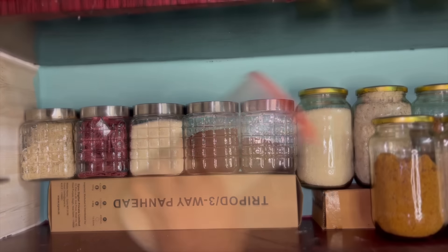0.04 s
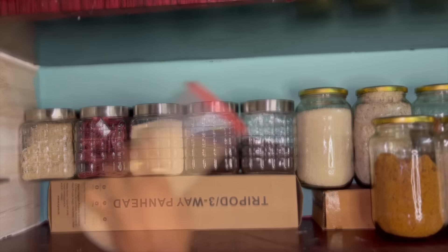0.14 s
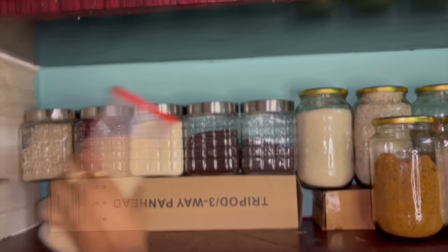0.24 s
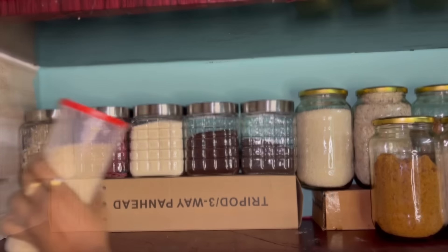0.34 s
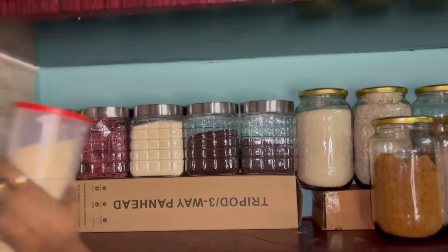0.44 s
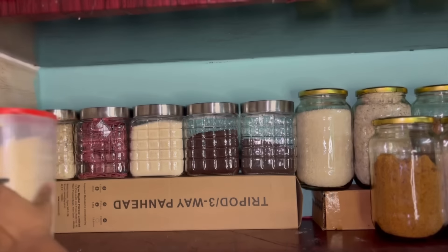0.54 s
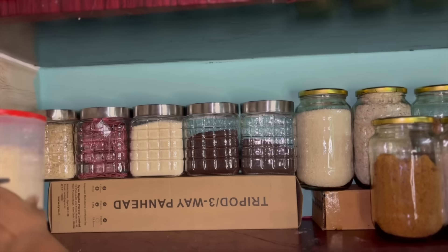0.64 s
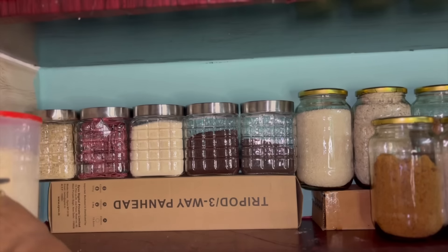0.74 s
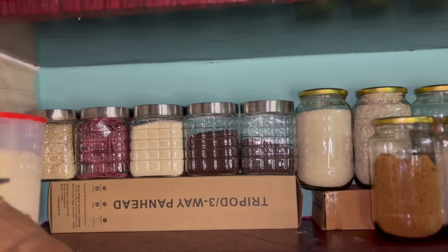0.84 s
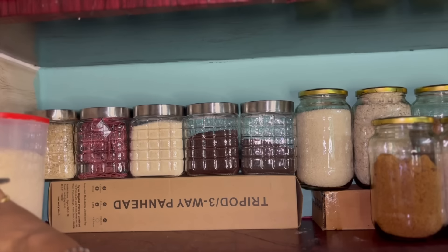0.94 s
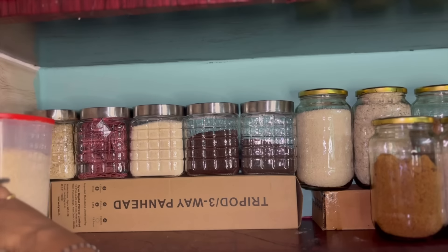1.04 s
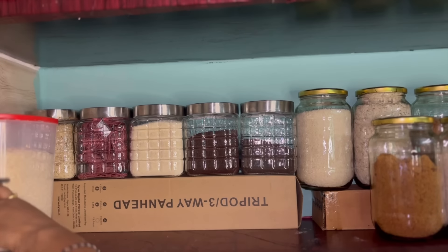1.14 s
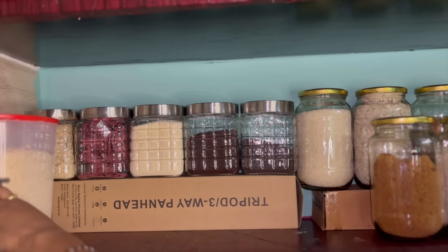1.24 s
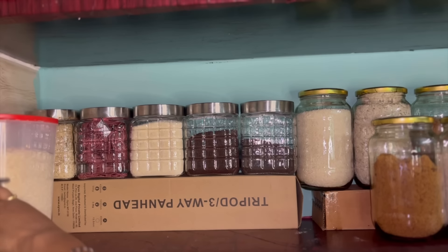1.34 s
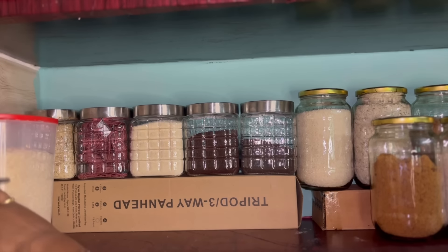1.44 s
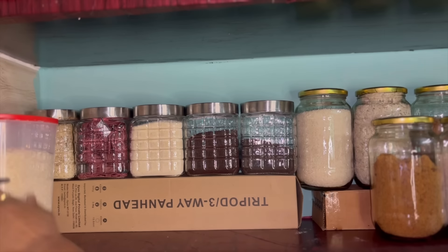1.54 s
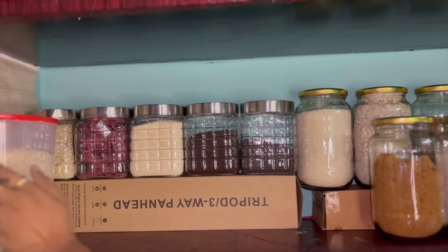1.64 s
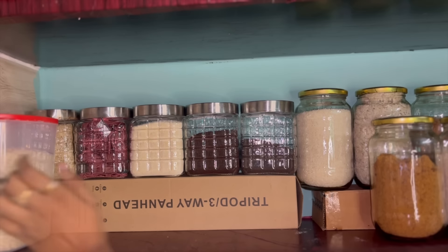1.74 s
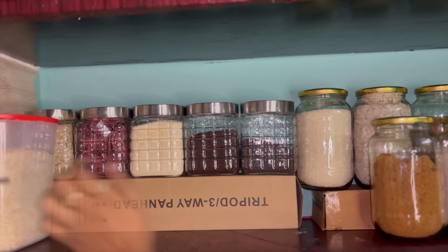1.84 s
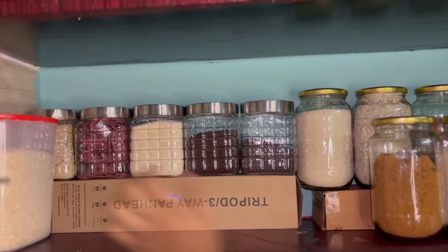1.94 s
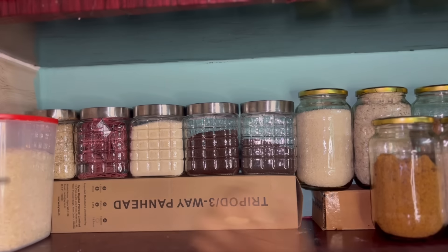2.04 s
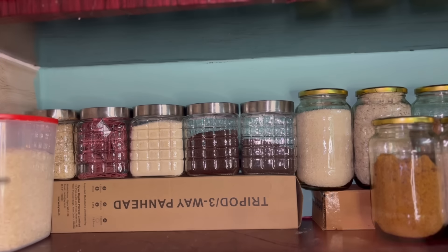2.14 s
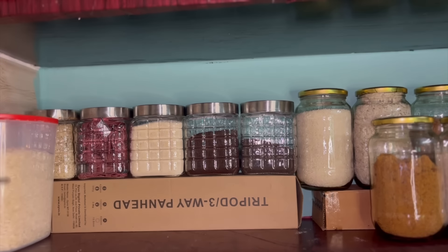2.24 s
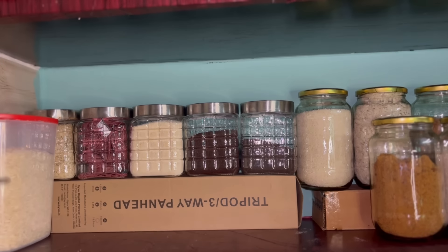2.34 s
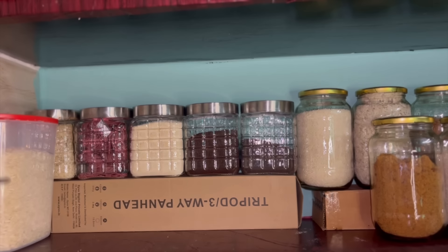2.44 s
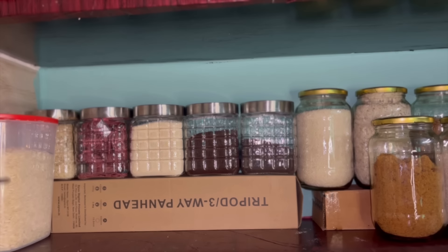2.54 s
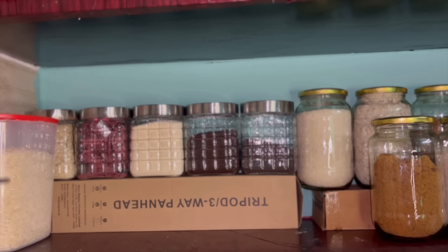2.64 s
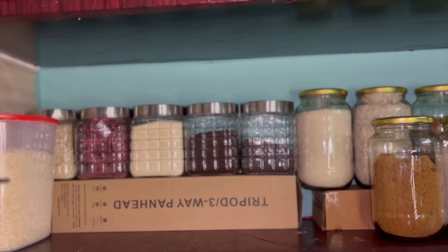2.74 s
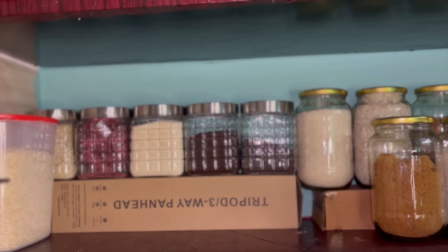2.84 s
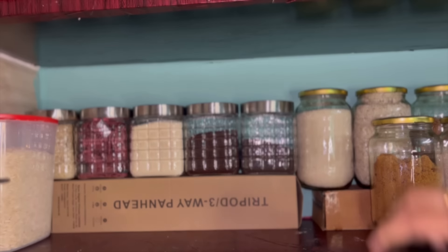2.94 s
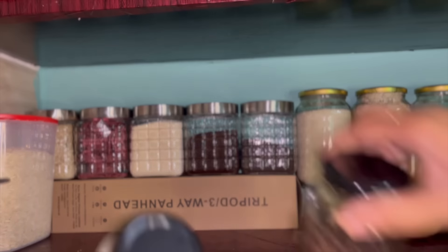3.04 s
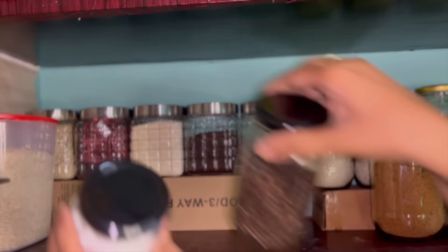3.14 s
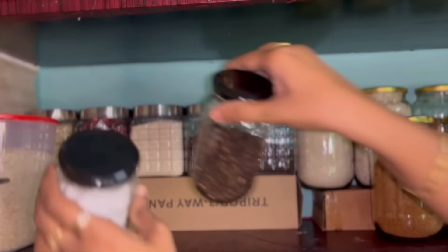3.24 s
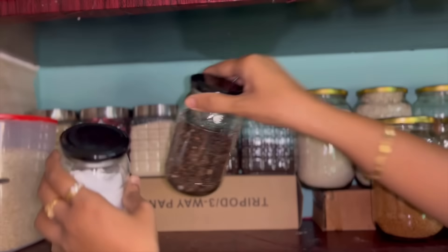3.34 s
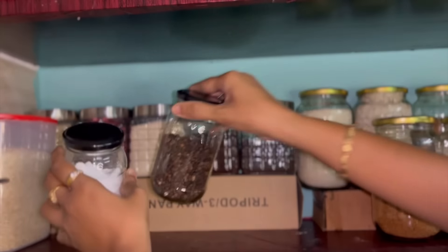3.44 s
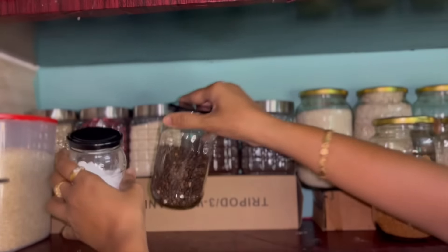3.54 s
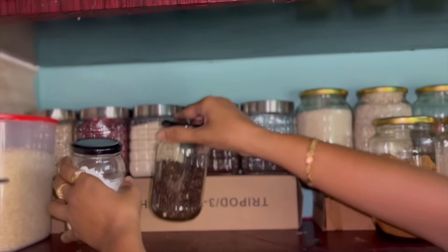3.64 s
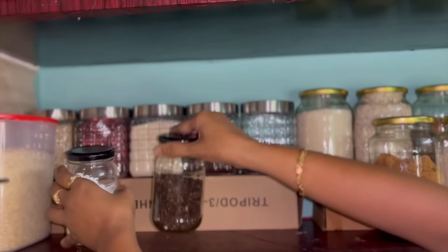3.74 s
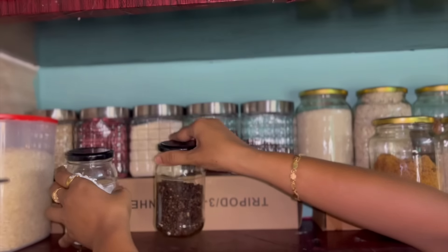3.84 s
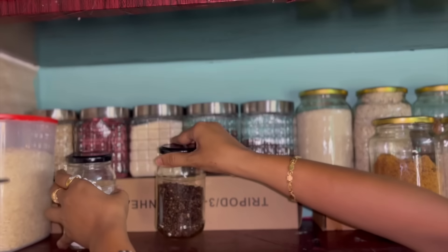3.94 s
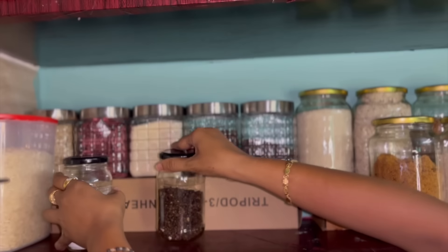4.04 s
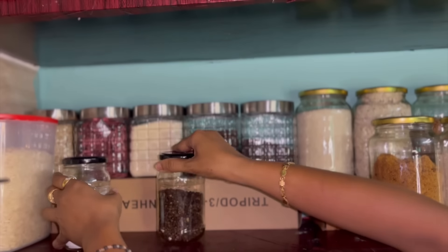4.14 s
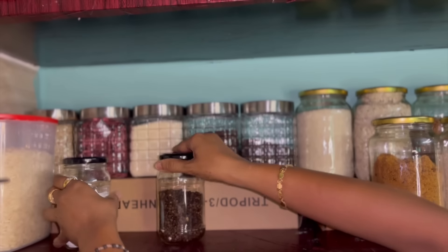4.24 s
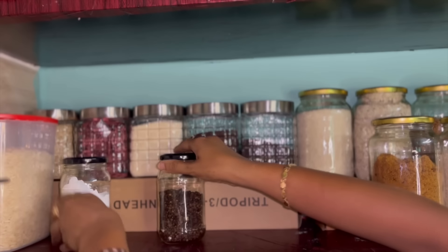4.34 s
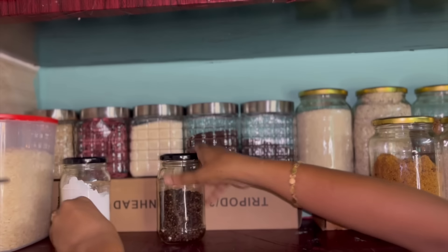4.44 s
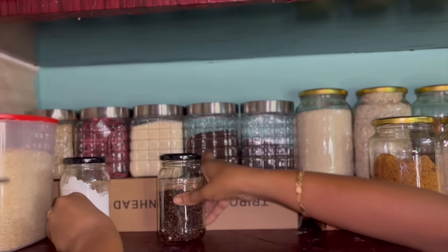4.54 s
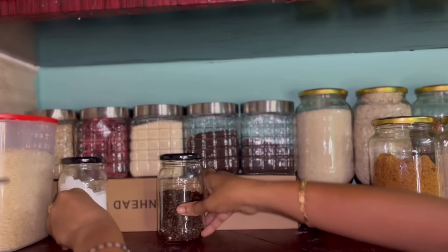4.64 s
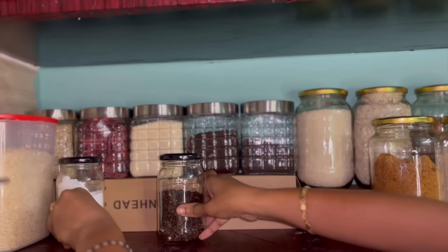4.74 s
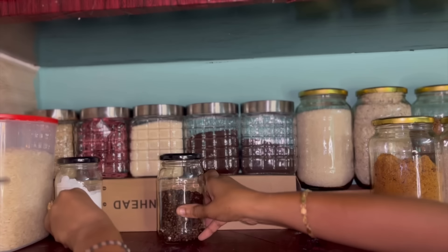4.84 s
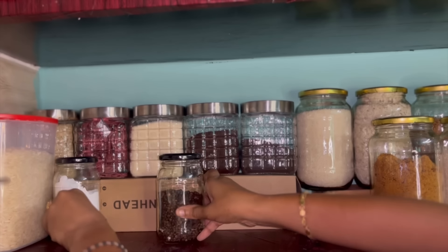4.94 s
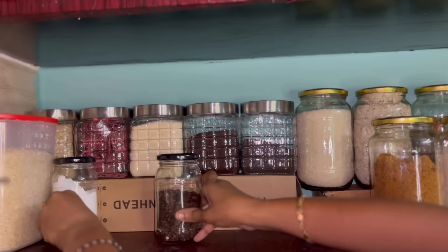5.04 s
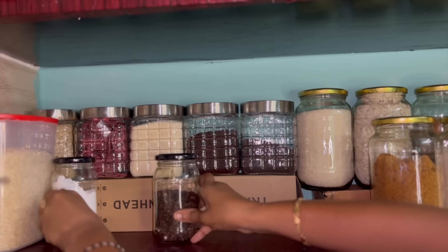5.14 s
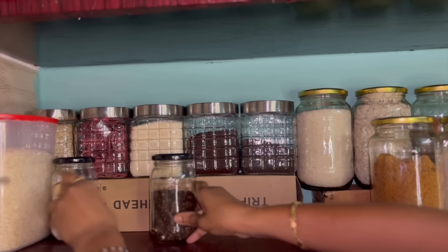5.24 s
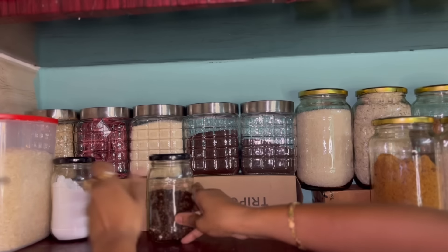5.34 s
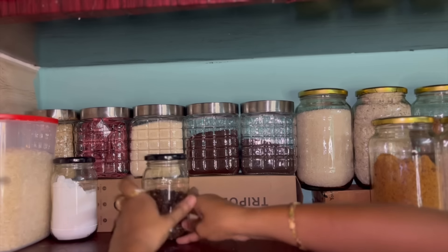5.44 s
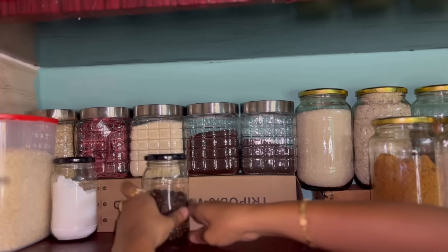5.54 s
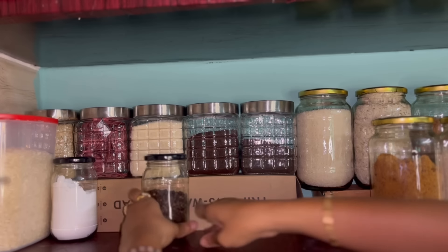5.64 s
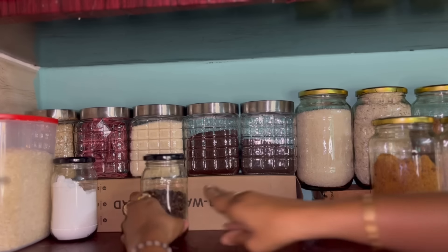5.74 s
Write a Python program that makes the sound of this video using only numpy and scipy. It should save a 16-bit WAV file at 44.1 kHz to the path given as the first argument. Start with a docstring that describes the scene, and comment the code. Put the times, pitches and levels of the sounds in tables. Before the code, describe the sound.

Grain rattles and hands rustle as a tub is put down in a cluster of dull plastic knocks, dragged and stopped by a heavy wall bump. Near silence follows, broken by one clink and a short double knock. Later a glass jar settles in quick rocking clunks, followed by soft taps and low drags of a heavy jar, with tiny bracelet ticks. Close stereo microphone, short indoor tail, low motor hum.

```python
"""A plastic tub of grain is put down, shoved along a pantry shelf and bumps the wall, close to a stereo microphone.
Something clinks off to the side, something knocks near the middle; two glass jars are set on the board: one
rocks, the one full of powder is nudged into line. Impacts are damped modes plus a noise crack, with a room tail.
Hands, grains and sliding bases are shaped noise bands; a bracelet ticks in short blurred rings.
A fridge-like hum (wavering line in narrow fuzz) and room hiss lie beneath."""
import sys
import numpy as np
from scipy import signal
from scipy.fft import rfft, irfft, next_fast_len
from scipy.io import wavfile
from scipy.ndimage import uniform_filter1d, map_coordinates

SR = 44100
rng = np.random.default_rng(int(sys.argv[2]) if len(sys.argv) > 2 else 0)


def transcribe(u):
    """Save the signal u as a 16-bit wav file named by the first command-line argument.

    u: samples, shape (n,) or (channels, n), limited to [-1, 1]; the rate is SR.
    q: integer samples, one column per channel.
    """
    v = np.clip(np.atleast_2d(u).T, -1, 1)
    q = np.round(v * 32767).astype(np.int16)
    wavfile.write(sys.argv[1], SR, q)


def voltage_ratio(level):
    """Linear amplitude factor for a level in decibels (scalar or array-like)."""
    return 10 ** (np.asarray(level, float) / 20)


N = 254898  # samples

# Impacts, mode drive per pitch group before trim: start_s, low_db, middle_db, high_db, crack_db, left_minus_right_db
TUB_BLOWS = [(0.326, -22.5, -25.5, -35.5, -48, 5), (0.331, -22, -21, -43, -51.5, -11),
             (0.43, -29, -73, -66, -59, -7), (0.482, -28.5, -70, -76, -61, 1),
             (0.532, -16.5, -36.5, -33, -43, 3.5), (0.595, -24, -55.5, -76, -43.5, -4),
             (0.654, -30.5, -52.5, -63, -46, -3), (0.738, -24.5, -31.5, -42, -48.5, -4.5),
             (0.806, -34, -47, -37, -42, -2)]
WALL_BUMP_BLOWS = [(1.074, -14, -16, -15, -38, 0.5), (1.082, -5.5, -15, -16.5, -42.5, 0.95)]
JAR_BLOWS = [(3.968, -36, -17, -21.5, -36.5, -13.5), (3.974, -30, -14, -23, -40, 10.5),
             (4.051, -29.5, -13, -14.5, -46.5, -4.5), (4.058, -37.5, -19, -19.5, -39, 9.5),
             (4.156, -37.5, -26.5, -38, -78, 2), (4.166, -44, -21, -34.5, -78.5, -1),
             (4.295, -50, -41.5, -83.5, -87, 8)]
POWDER_JAR_BLOWS = [(4.512, -56, -53, -72, -69.5, 2.3), (4.561, -41, -28.5, -49.5, -73, 3.9),
                    (4.596, -31.5, -34, -54.5, -78, 9.7), (4.62, -37, -32, -45.5, -73, 1.9),
                    (4.723, -45, -30.5, -40.5, -80, 3.2), (4.899, -43.5, -55, -68, -78.5, 3.1),
                    (5.001, -48.5, -46.5, -71, -68, 5), (5.109, -58, -57, -60, -70, 3.1),
                    (5.169, -39.5, -49, -59.5, -75, 2.3), (5.728, -47.5, -48, -63, -72.5, 7.0),
                    (5.747, -49, -40, -50, -64, 1.0), (5.771, -33, -26.5, -42, -61, 8.6)]
CLINK_BLOWS = [(2.157, -63, -31.5, -24, -33, -0.5), (2.165, -36, -32.5, -26.5, -40.5, -19.5)]
KNOCK_BLOWS = [(2.5, -22.5, -18, -31.5, -60, -3.5), (2.517, -25.5, -32, -42, -54, 4.5)]
# Borders of the low, middle and high mode groups: pitch_hz
GROUP_EDGES_HZ = [350, 1100]

# Modes of each object, board included: pitch_hz, relative_db, t60_s
TUB_MODES = [(107, -2.5, 0.1), (144.6, -10, 0.052), (218, 0.5, 0.12), (251.8, 3, 0.088), (403, -5, 0.12),
             (491.6, 10.5, 0.057), (530, -2, 0.021), (710, -2, 0.0088), (771, -1, 0.053), (901, -5, 0.043),
             (1138, 3.5, 0.03), (1296, 4.5, 0.048), (1680, 3, 0.056), (1930, 6.5, 0.017), (2382, 1, 0.025)]
WALL_BUMP_MODES = [(91, -8.5, 0.066), (151, -10.5, 0.11), (213.7, -0.5, 0.06), (412, -1.5, 0.17),
                   (591, 7.5, 0.031), (819, -6.5, 0.19), (941, -2, 0.061), (1140, -0.5, 0.045),
                   (1290, 2, 0.024), (1585, -11.5, 0.054), (1835, -5, 0.065), (2373, -1.5, 0.047),
                   (2530, 4, 0.027), (2620, -3.5, 0.052), (3040, -17, .04), (3430, -12, 0.03)]
JAR_MODES = [(205, -2, 0.1), (290, -10.5, 0.021), (416.7, -3.5, 0.051), (492, 5, 0.048),
             (570.7, -8.5, 0.084), (739, 2, 0.026), (786, -10.5, 0.047), (906, -15, 0.085),
             (995, -9.5, 0.051), (1173, 0.5, 0.047), (1299.5, 4.5, 0.057), (1456, -10, 0.027),
             (1564, -5, 0.031), (1697, -11.5, 0.061), (1940, -14.5, 0.051), (2240, -15.5, 0.027),
             (2401, -20, 0.054), (3280, -29, 0.085)]
POWDER_JAR_MODES = [(198.7, -2.5, 0.21), (237.6, -8, 0.19), (405.8, 2.5, 0.17), (487.5, 3.5, 0.1),
                    (567, 0, 0.068), (774, -9, 0.08), (990, -22, 0.068), (1245, 4.5, 0.035),
                    (1274, 7.5, 0.05), (1776, -10.5, 0.051)]
CLINK_MODES = [(254, 6, 0.045), (511, 5.5, 0.056), (794.5, 9, 0.041), (1168, 4.5, 0.019), (1370, -4, 0.051),
               (1365, -0.5, 0.065), (1599, -2, 0.052), (2070, -12.5, 0.14), (3280, -19.5, 0.097),
               (3594, -6, 0.079), (3430, -3.5, 0.085), (3690, -12, 0.024), (3950, -7, 0.04),
               (4245, -5, 0.022), (4530, -7.5, 0.031), (4380, -7.5, 0.031), (4750, -4.5, 0.041),
               (4800, -6.5, 0.05), (5020, -6.5, 0.088)]
KNOCK_MODES = [(73.5, -15.5, 0.76), (261.8, -4.5, 0.14), (327, 1.5, 0.11), (527, -0.5, 0.037),
               (542, -6.5, 0.086), (784, -4.5, 0.11), (893, 3, 0.075), (1290, 5, 0.053),
               (1361, 11.5, 0.048), (1483, 11.5, 0.039), (1680, -2.5, 0.04), (2160, -9, 0.053),
               (2560, -19.5, 0.036)]

# Contact noise, bright and dull (thick glass on wood): frequency_hz, relative_db_per_hz
CRACK_SPECTRUM = [(1500, 1), (3000, -0.5), (5000, -2.5), (6800, -8.5), (9000, -5.5), (11500, -14),
                  (12800, -30.5), (14200, -14), (15600, -11.5), (16400, -39.5)]
DULL_CRACK_SPECTRUM = [(1800, -13.5), (3000, 1), (4200, -8), (5500, -10), (6500, -22), (9000, -27.5),
                       (12000, -44)]

# Hand strokes: peak_s, length_s, skin_rustle_db, grain_rattle_db
STROKES = [(0.06, 0.27, -61.5, -57.5), (0.15, 0.069, -58, -54), (0.205, 0.036, -75, -64),
           (0.39, 0.093, -61.5, -56.5), (0.56, 0.085, -50, -48), (0.61, 0.26, -56.5, -53),
           (0.95, 0.41, -76.5, -69), (1.44, 0.062, -81, -93), (1.57, 0.22, -70, -76),
           (1.75, 0.052, -66, -88), (1.86, .06, -83, -95), (2.02, 0.18, -81, -75), (2.2, 0.19, -73.5, -61),
           (2.58, 0.73, -100, -81), (3.0, .25, -82, -73.5), (3.12, 0.42, -78.5, -68),
           (3.3, 0.49, -88.5, -71.5), (4.0, 0.41, -89.5, -77), (4.36, 0.31, -68, -71),
           (4.54, 0.22, -75, -68.5), (4.72, 0.99, -84, -78.5), (4.98, 0.088, -66, -72),
           (5.16, 0.11, -75.5, -80), (5.28, 0.17, -66.5, -71.5), (5.48, 0.29, -64.5, -68.5),
           (5.69, .07, -66.5, -72), (5.75, .03, -67.5, -75), (5.8, 0.09, -76, -59)]
# Bases pushed along the board: peak_s, length_s, scrape_db, drag_db, shelf_rumble_db
SHOVES = [(0.12, 0.15, -62.5, -64, -64), (0.35, 0.12, -59, -51, -35.5), (0.48, 0.13, -71, -53.5, -39.5),
          (0.57, 0.23, -52.5, -45.5, -38.5), (0.68, 0.39, -61, -63, -47), (1.0, 0.69, -64.5, -63.5, -54),
          (2.35, 0.53, -69, -73, -67), (2.7, 1, -73.5, -69.5, -65), (3.25, .8, -74.5, -60, -66),
          (4.03, 0.28, -66, -51.5, -44), (4.17, 0.26, -69.5, -46.5, -49), (4.66, 0.64, -80, -53, -49.5),
          (5.25, 1.1, -72, -65.5, -57.5)]
# Steady murmur in the scrape, drag and rumble bands, mean: level_db
STILL_DB = [-72.5, -71, -68.5]
# Handling noise bands: frequency_hz, relative_db_per_hz
RATTLE_SPECTRUM = [(1800, -3.5), (2800, -5), (3500, -6), (5000, -3.5), (6200, -5.5), (7200, -33)]
RUSTLE_SPECTRUM = [(6200, -2.5), (7500, 6.5), (9500, 5.5), (11500, 4.5), (12200, -26)]
TOP_RUSTLE_SPECTRUM = [(13000, -29.5), (13800, -5), (14800, -14.5), (15700, -1.5), (16300, -28.5)]
SCRAPE_SPECTRUM = [(600, -33.5), (900, -7), (1300, -2), (1700, -0.5), (2200, -5), (2700, -44), (3500, -52)]
DRAG_SPECTRUM = [(110, -3.5), (160, 1), (210, 2), (300, -4), (420, 0), (550, -4), (700, -12), (1000, -20.5)]
RUMBLE_SPECTRUM = [(35, -49.5), (55, 6.5), (75, 8.5), (110, 4), (150, -17.5), (200, -38.5)]

# Bracelet ticks, mode drive per bead group: start_s, middle_db, low_db, high_db, left_minus_right_db
BRACELET_TICKS = [(2.518, -54.5, -49, -82.5, -3), (2.603, -58.5, -60.5, -71, -5.5),
                  (3.0294, -75, -59.5, -86.5, -11), (3.078, -58, -61, -74, -8),
                  (3.1512, -45.5, -59, -65, 1), (3.1626, -54, -52.5, -58.5, -9),
                  (3.4415, -63, -77, -83.5, 1.0), (3.9079, -75, -66.5, -109, 0),
                  (4.0512, -68, -64, -62.5, -10.5), (4.1026, -61.5, -63, -71, -6.5),
                  (4.352, -60, -72.5, -64, 2.5), (4.543, -56, -62.5, -69.5, -8),
                  (4.9691, -45.5, -64.5, -54, -3.5), (5.1694, -67, -82.5, -81, -3)]
# Bead modes: pitch_hz, relative_db, t60_s
BRACELET_MODES = [(3430, -1.5, 0.017), (5000, 0.5, 0.016), (5800, -5.5, 0.018), (7850, -7.5, 0.027),
                  (9000, -11, 0.014), (9900, -5.5, 0.031), (11000, -8, .015), (14200, -6.5, 0.014),
                  (15200, 9, .012)]
# Borders of the low, middle and high bead groups: pitch_hz
BEAD_EDGES_HZ = [6500, 12000]

# Fuzz around the hum, room hiss: frequency_hz, relative_db_per_hz
HUM_SPECTRUM = [(22, -26.5), (40, -18), (52, -19), (60, -3.5), (64, -8.5), (75, -9), (100, -32.5)]
AIR_SPECTRUM = [(20, -5.5), (40, -7.5), (200, -13.5), (2500, -27), (6000, -30.5), (11000, -41.5),
                (13000, -51.5), (20000, -61.5)]
# Reverberation: frequency_hz, t60_s
ROOM_DECAY = [(100, 0.58), (400, 0.29), (1500, 0.29), (5000, 0.26), (12000, 0.094)]

TOP_RUSTLE_DB = -0.5  # top treble of the hand rustle re its lower treble
SWELL_DB, FADE_DB, POINT = 80.5, 23, 1.6  # loss one length before, after the peak; larger POINT = flatter top
UNEVEN_DB, UNEVEN_PER_S = 3, 30
HUM_HZ = 60
MONO_HZ, LOW_CUT_HZ = 190, 42


def tub():
    """Plastic tub of grain put down: thuds and knocks with a bright crack."""
    return struck(TUB_BLOWS, TUB_MODES, CRACK_SPECTRUM, trim_db=-2.5, rise_s=0.003, crack_t60_s=0.12,
                  turn_rad=0.28, rough=0.061, shade_hz=203.4, wet_db=-9.5)


def wall_bump():
    """Tub meets the wall: strong low modes with a bright crack."""
    return struck(WALL_BUMP_BLOWS, WALL_BUMP_MODES, CRACK_SPECTRUM, trim_db=-3.0, rise_s=0.003, crack_t60_s=0.19,
                  turn_rad=0.3, rough=0.023, shade_hz=200.6, wet_db=-10.0)


def jar():
    """Glass jar set on the board, rocking: repeated blows with a dull crack."""
    return struck(JAR_BLOWS, JAR_MODES, DULL_CRACK_SPECTRUM, trim_db=4.5, rise_s=0.0048, crack_t60_s=0.026,
                  turn_rad=0.53, rough=0.015, shade_hz=295.4, wet_db=-10)


def powder_jar():
    """Full jar set down and nudged into line: soft blows, few modes, dull crack."""
    return struck(POWDER_JAR_BLOWS, POWDER_JAR_MODES, DULL_CRACK_SPECTRUM, trim_db=0.5, rise_s=0.0044,
                  crack_t60_s=0.034, turn_rad=0.53, rough=0.028, shade_hz=300, wet_db=-8.0)


def clink():
    """Something clinks off to the side: modes reaching 5 kHz, short bright crack."""
    return struck(CLINK_BLOWS, CLINK_MODES, CRACK_SPECTRUM, trim_db=-4.5, rise_s=0.0021, crack_t60_s=0.032,
                  turn_rad=0.53, rough=0.033, shade_hz=4970, wet_db=-5.0)


def knock():
    """Something knocks: two close blows near the middle, modes under 2.6 kHz, dull crack."""
    return struck(KNOCK_BLOWS, KNOCK_MODES, DULL_CRACK_SPECTRUM, trim_db=-1.5, rise_s=0.0013, crack_t60_s=0.063,
                  turn_rad=0.32, rough=0.039, shade_hz=300, wet_db=-10)


def struck(blows, modes, crack_spectrum, trim_db, rise_s, crack_t60_s, turn_rad, rough, shade_hz, wet_db):
    """Each blow drives low, middle and high modes by its own amounts and cracks at the contact."""
    out = np.zeros((2, N + SR))
    t = np.arange(SR // 3) / SR
    group = np.searchsorted(GROUP_EDGES_HZ, [hz for hz, _, _ in modes])
    for start_s, *drive_db, crack_db, pan_db in blows:
        noise = unit(coloured(rng.standard_normal(len(t)), crack_spectrum))
        crack = noise * voltage_ratio(crack_db - 60 * t / crack_t60_s) * (1 - np.exp(-t / rise_s))
        mode_drive_db = trim_db + np.array(drive_db)[group, None]
        body = ring(modes, mode_drive_db, pan_db, rise_s, turn_rad, rough, shade_hz)
        add(out, start_s, body + sides(pan_db) * crack, wet_db)
    return out[:, :N]


def ring(modes, drive_db, pan_db, rise_s, turn_rad, rough, shade_hz):
    """Damped modes swell during contact; chatter blurs each by the share rough of its pitch."""
    hz, db, t60_s = np.transpose(modes)[:, :, None]
    t = np.arange(SR // 3) / SR
    scatter_db = 1.5 * rng.standard_normal((len(modes), 1))
    decay = voltage_ratio(db + drive_db + scatter_db - 60 * t / t60_s)
    envelope = decay * (1 - np.exp(-(t / rise_s) ** 2))
    steps = rng.standard_normal((len(modes), len(t)))
    for _ in range(2):
        steps = uniform_filter1d(steps, size=24)
    phase = 2 * np.pi * hz * t + np.sqrt(2 * np.pi * rough * hz / SR) * np.cumsum(steps, 1)
    # neighbouring modes lead at opposite ports
    lead = turn_rad * (-1) ** np.arange(len(modes))[:, None]
    # low modes bend round the microphone
    shade_db = pan_db / 2 * np.minimum(hz / shade_hz, 1)
    ports = [voltage_ratio(side * shade_db) * envelope * np.sin(phase + side * lead) for side in (1, -1)]
    return np.array([port.sum(0) for port in ports])


def hands():
    """Grain rattles, skin rustles, bases scrape and drag on the board, the shelf rumbles."""
    uneven = voltage_ratio(UNEVEN_DB * wobble(UNEVEN_PER_S))
    rustle, rattle = uneven * curves(STROKES)
    still = voltage_ratio(np.array(STILL_DB)[:, None] + [1.5 * wobble(6.2) for _ in STILL_DB])
    scrape, drag, rumble = np.hypot(curves(SHOVES), still)
    top_rustle = voltage_ratio(TOP_RUSTLE_DB) * rustle
    return (rattle * rush(RATTLE_SPECTRUM, alike=0.098, grain_db=1.5, grain_per_s=250)
            + rustle * rush(RUSTLE_SPECTRUM, alike=0.24, grain_db=2.0, grain_per_s=300)
            + top_rustle * rush(TOP_RUSTLE_SPECTRUM, alike=-.3, grain_db=0.5, grain_per_s=300)
            + scrape * rush(SCRAPE_SPECTRUM, alike=0.068, grain_db=1.0, grain_per_s=130)
            + drag * rush(DRAG_SPECTRUM, alike=0.26, grain_db=-0.1, grain_per_s=20)
            + rumble * rush(RUMBLE_SPECTRUM, alike=0.51, grain_db=-0.7, grain_per_s=20))


def curves(rows):
    """One gain per sample for each dB column: movements swell fast to the peak, fade slower, add in power."""
    peak_s, length_s, *levels_db = np.transpose(rows)[:, :, None]
    knots = np.arange(0, N, 32)
    away = (knots / SR - peak_s) / length_s
    shape_db = -np.where(away < 0, SWELL_DB, FADE_DB) * np.abs(away) ** POINT
    gains = [np.sqrt((voltage_ratio(db + shape_db) ** 2).sum(0)) for db in levels_db]
    return [np.interp(np.arange(N), knots, gain) for gain in gains]


def bracelet():
    """Small beads tick as the wrist turns: short, blurred rings."""
    out = np.zeros((2, N + SR))
    group = np.searchsorted(BEAD_EDGES_HZ, [hz for hz, _, _ in BRACELET_MODES])
    for start_s, middle_db, low_db, high_db, pan_db in BRACELET_TICKS:
        drive_db = np.array([low_db, middle_db, high_db])[group, None]
        tick = ring(BRACELET_MODES, drive_db, pan_db, rise_s=0.00069, turn_rad=0.29, rough=0.032, shade_hz=3000)
        add(out, start_s, tick, wet_db=2.5)
    return out[:, :N]


def hum():
    """A motor hums somewhere: a slightly unsteady line in narrow fuzz."""
    level = voltage_ratio(-56 + 1.5 * wobble(7))
    pitch_hz = HUM_HZ + 1.5 * wobble(6)
    line = level * np.sin(2 * np.pi * np.cumsum(pitch_hz) / SR)
    return line + voltage_ratio(-62) * rush(HUM_SPECTRUM, alike=.99, grain_db=.3, grain_per_s=8)


def air():
    """Still room air: broad stereo hiss, falling toward the treble."""
    return voltage_ratio(-74.5) * rush(AIR_SPECTRUM, alike=0.19, grain_db=0.3, grain_per_s=2.0)


def add(out, start_s, sound, wet_db):
    """Places a sound and its room tail at start_s."""
    start = round(start_s * SR)
    sound = np.pad(sound, ((0, 0), (0, SR // 6)))
    out[:, start:start + sound.shape[1]] += sound + voltage_ratio(wet_db) * room(sound)


def room(x):
    """A fresh noise tail for each sound; each frequency decays at its own rate."""
    hz, t, z = signal.stft(rng.standard_normal((2, SR // 2)), SR, nperseg=256)
    f, t60_s = np.transpose(ROOM_DECAY)
    band_t60_s = np.interp(np.log(hz + 1), np.log(f), t60_s)[:, None]
    tail = signal.istft(z * voltage_ratio(-60 * t / band_t60_s), SR, nperseg=256)[1]
    # builds up over 5 ms, as from the first wall
    tail = tail * (1 - np.exp(-np.arange(tail.shape[1]) / SR / 0.005))
    return signal.fftconvolve(x, tail / np.linalg.norm(tail[0]), axes=1)[:, :x.shape[1]]


def rush(spectrum, alike, grain_db, grain_per_s):
    """Stereo noise of rms 1: channel correlation alike, level lumpy."""
    turn = np.arccos(np.clip(alike, -1, 1)) / 2
    a, b = rng.standard_normal((2, N)) * voltage_ratio(grain_db * wobble(grain_per_s))
    left = np.cos(turn) * a + np.sin(turn) * b
    right = np.cos(turn) * a - np.sin(turn) * b
    return unit(coloured(np.array([left, right]), spectrum))


def coloured(x, spectrum):
    """x through a spectrum of (Hz, dB) points on a log axis, -120 dB outside."""
    m = next_fast_len(x.shape[-1] + 8192)
    f, db = np.transpose(spectrum)
    log_hz = np.log(np.fft.rfftfreq(m, 1 / SR) + 1)
    gain = voltage_ratio(np.interp(log_hz, np.log(f), db, -120, -120))
    return irfft(rfft(x, m) * gain, m)[..., :x.shape[-1]]


def wobble(knots_per_s):
    """A smooth random curve through normal-distributed knots."""
    knots = rng.standard_normal(int(N * knots_per_s / SR) + 4)
    return map_coordinates(knots, [np.arange(N) * knots_per_s / SR])


def sides(db):
    """Left and right gains for a left-minus-right difference."""
    return voltage_ratio(np.array([[db / 2], [-db / 2]]))


def unit(x):
    """Scaled to rms 1."""
    return x / np.sqrt(np.mean(x ** 2) + 1e-20)


def scene():
    """All the handling in the kitchen's still air."""
    impacts = tub() + wall_bump() + clink() + knock() + jar() + powder_jar()
    return impacts + bracelet() + hands() + hum() + air()


def roll_off(x):
    """The treble ends steeply here."""
    return signal.sosfilt(signal.butter(12, 16800, fs=SR, output="sos"), x)


def record(dry):
    """Close ports share the bass (side high-passed); the microphone cuts the lowest rumble."""
    mid = dry.mean(0)
    side_filter = signal.butter(3, MONO_HZ, "high", fs=SR, output="sos")
    side = signal.sosfilt(side_filter, dry[0] - mid)
    low_cut = signal.butter(6, LOW_CUT_HZ, "high", fs=SR, output="sos")
    mid = signal.sosfilt(low_cut, mid)
    return roll_off(np.array([mid + side, mid - side]))


dry = scene()
out = record(dry)
transcribe(out)
```